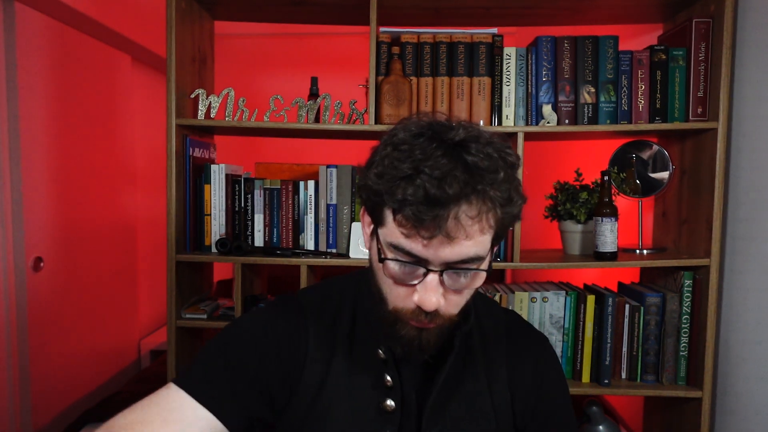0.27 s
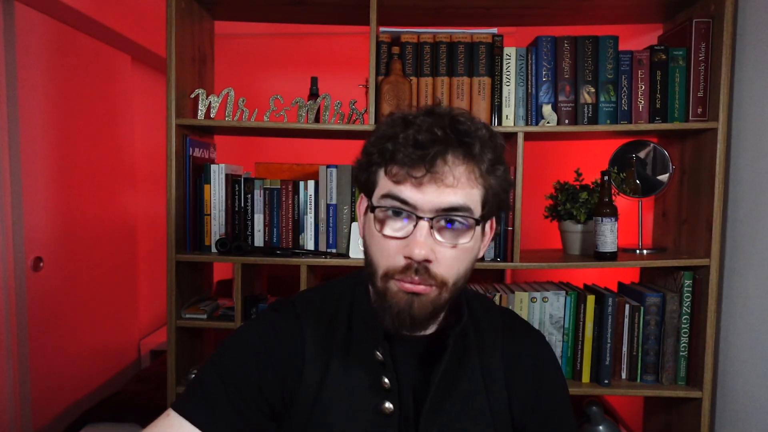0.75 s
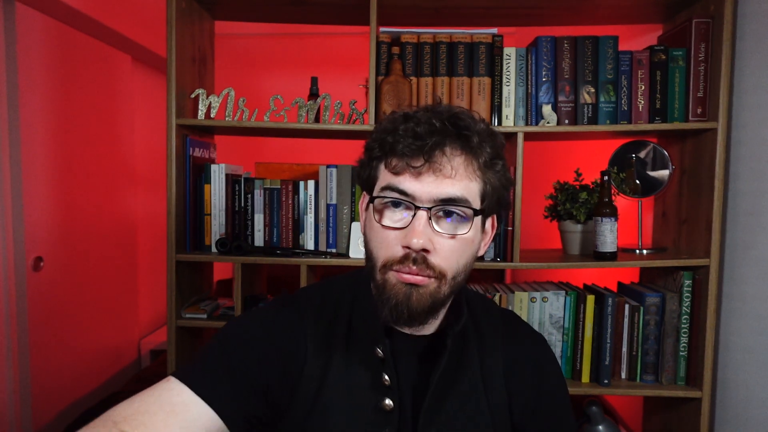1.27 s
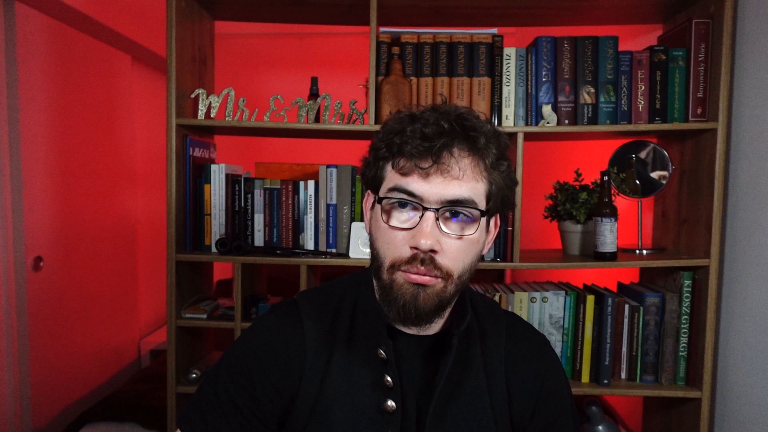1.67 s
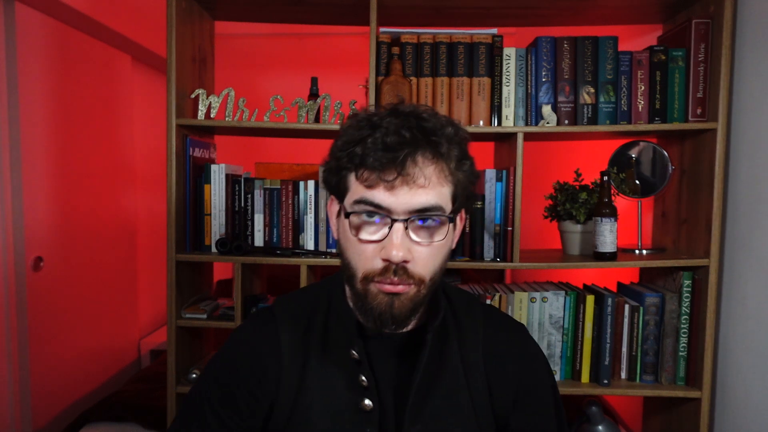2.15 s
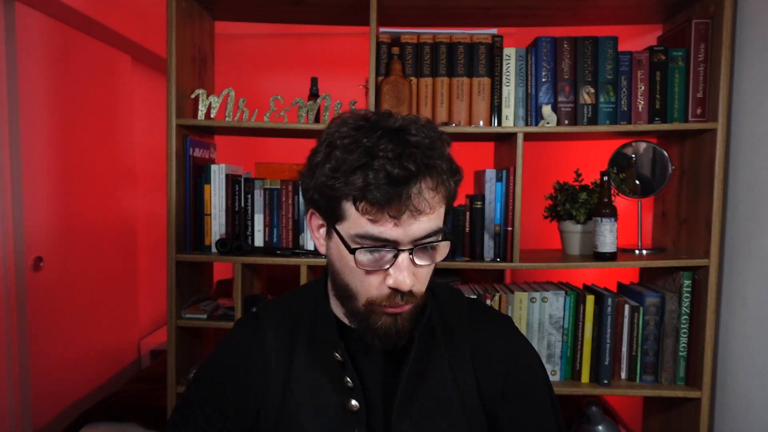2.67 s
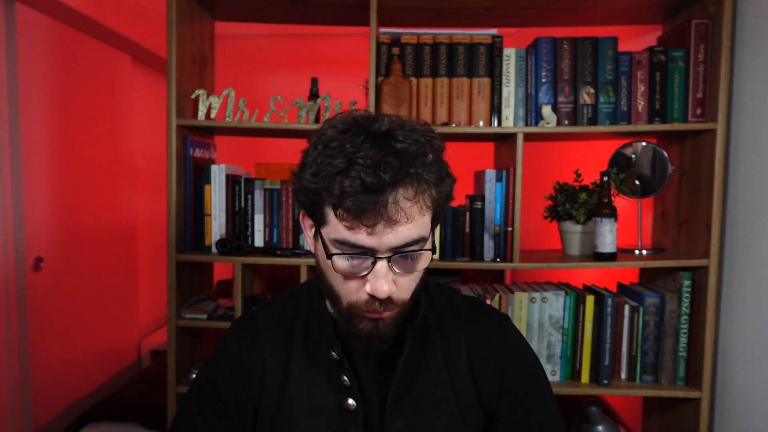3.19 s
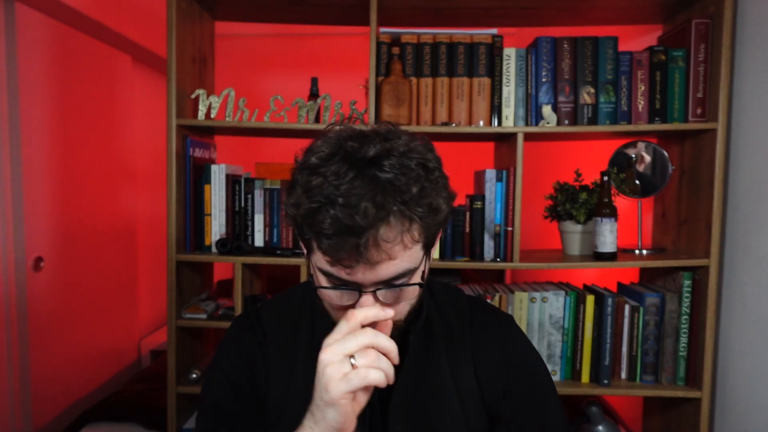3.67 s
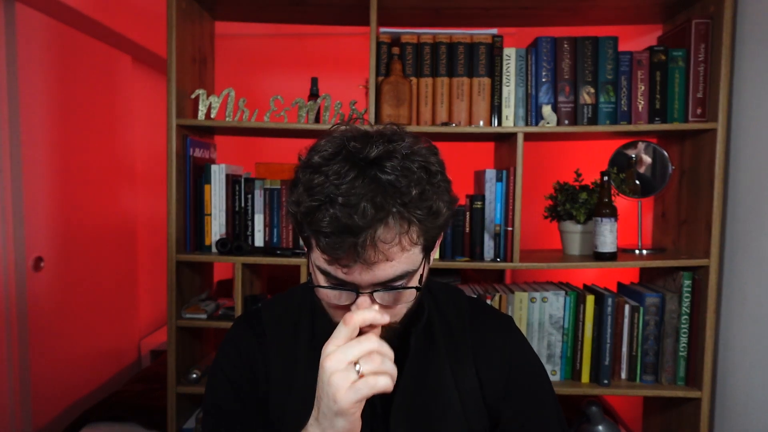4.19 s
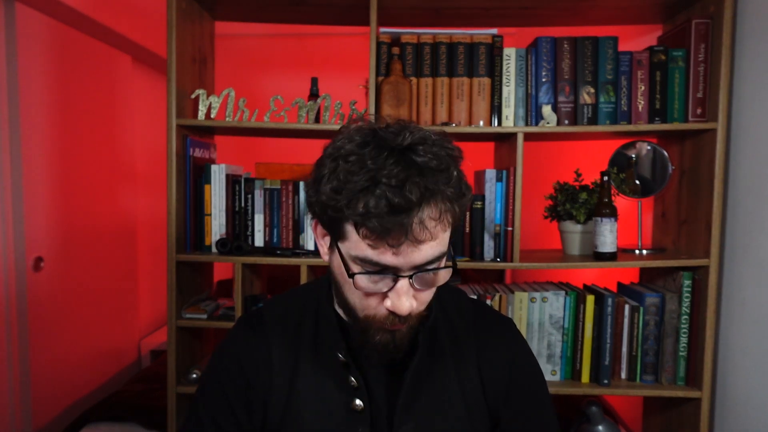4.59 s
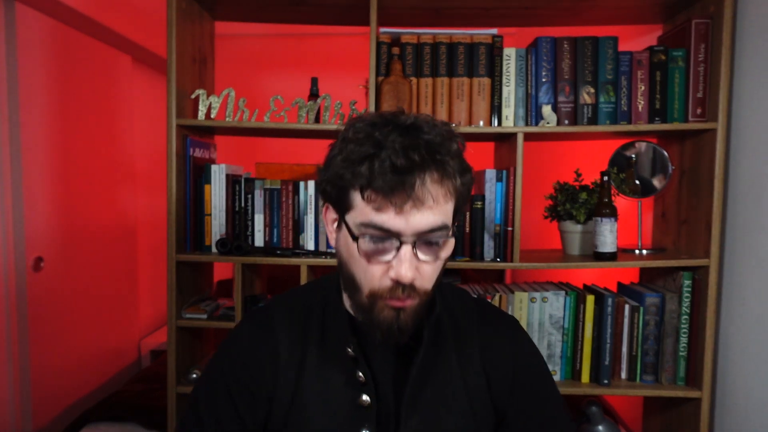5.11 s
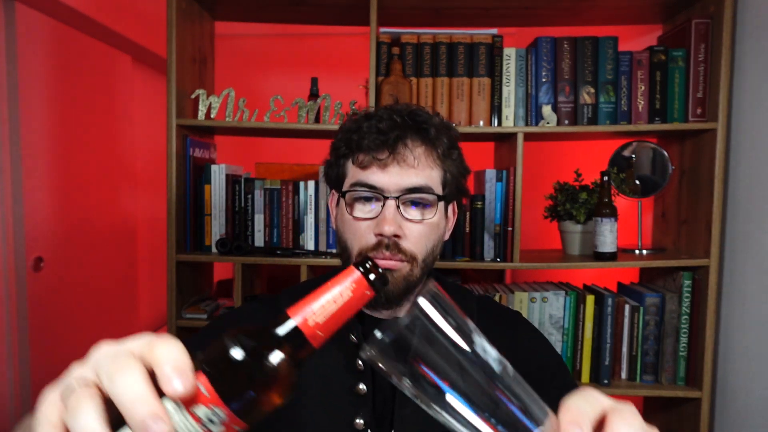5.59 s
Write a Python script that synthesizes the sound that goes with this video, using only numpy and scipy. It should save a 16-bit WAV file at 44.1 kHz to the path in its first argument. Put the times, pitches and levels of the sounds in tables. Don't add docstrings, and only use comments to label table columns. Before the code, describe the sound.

Bottle thuds and clinks on wood, small metal jingles, a cap pops with a rasping burst of gas, and a glass scrapes softly across boards.

```python
import sys
import numpy as np
from scipy import signal
from scipy.fft import rfft, irfft, next_fast_len
from scipy.io import wavfile
from scipy.ndimage import map_coordinates

SR = 44100
rng = np.random.default_rng(int(sys.argv[2]) if len(sys.argv) > 2 else 0)


def attenuation_scalar(level_db):
    decades = np.asarray(level_db, float) / 20
    return 10 ** decades


def dump_mix(stems):
    frames = np.atleast_2d(stems).T
    limited = np.clip(frames, -1, 1)
    pcm = np.round(limited * 32767).astype(np.int16)
    wavfile.write(sys.argv[1], SR, pcm)


N = 257984

# frequency in Hz, level in dB.
WHINES = [(6040, -90.5), (8107, -80.5), (10137, -85.5), (12150, -91)]
# frequency in Hz, level in dB per Hz.
HISS_COLOUR = [(18, -64), (30, -37.5), (86, -0.5), (266, 3), (328, -3.5), (569, -7), (844, -9),
               (1390, -10.5), (5310, -18.5), (8300, -20), (16000, -20.5)]
# frequency in Hz, likeness [0-1].
HISS_ALIKE = [(60, 0.46), (240, 0.56), (950, 0.33), (3770, 0.5), (15000, 0.17)]
# frequency in Hz, likeness [0-1].
ALIKE = [(100, 0.92), (700, 0.95), (1500, 0.81), (12000, 0.79)]
# frequency in Hz, t60 in seconds.
ROOM_DECAY = [(150, 0.96), (1000, 0.45), (4000, 0.3), (12000, 0.2)]
# frequency in Hz, level in dB.
ROOM_WIDTH = [(200, -10), (700, -7), (1500, -3), (8000, -0.5)]

# start in seconds, peak in dB, brightness in dB, ring in dB, scrape t60 in seconds.
KNOCKS = [(0.0014, -21, 5.5, -3, 0.27), (0.0295, -24.5, -1.5, 1.5, 0.19), (0.0825, -26.5, -4, -9, 0.093),
          (0.003, -38, 2, -26.5, 0.64), (.19, -44.5, -21, -14.5, 0.067), (.2189, -48, -10.5, -15, 0.12),
          (0.3326, -41.5, 8, -17.5, 0.17), (0.4304, -36.5, -5.5, -15, 0.81), (0.4455, -16.5, 4, -19.5, 0.1),
          (0.451, -25.5, 0, -16, 0.11), (0.479, -34.5, -8, -11.5, 0.068), (0.5549, -31.5, -7, -14, 0.07),
          (0.5845, -23.5, -5.5, -30, 0.095), (0.6174, -51.5, -1.5, -20.5, 0.38),
          (0.372, -49, -2, -11, 0.44), (2.382, -34.5, -20, -24.5, 0.34), (3.395, -39, -15.5, -18, 0.16),
          (3.403, -42, -15.5, -19, 0.19)]
# frequency in Hz, level in dB per Hz.
KNOCK_COLOUR = [(290, -22), (500, 3), (784, -17.5), (1250, -0.5), (1620, -10.5), (3150, -4), (3810, -9.5),
                (4800, -4), (6700, -12.5), (7530, -6), (16000, -14)]
# frequency in Hz, level in dB, t60 in seconds.
BOTTLE_MODES = [(1340, -21.5, 0.071), (2470, -26.5, 1), (2540, -27.5, 0.98), (2650, -22.5, 1),
                (2920, -6.5, 0.12), (3130, -28.5, .8), (3020, -12.5, .12), (3260, -4, 0.11), (7570, -7, .1),
                (10200, -20, 0.055), (12400, -6.5, 0.16)]
# start in seconds, peak in dB, deep mode in dB, low mode in dB, rattle in dB.
THUMPS = [(0.004, -12.5, -9, -9, -13), (0.026, -19, -25.5, -20, -21), (0.085, -11.5, -26.5, -11.5, -7),
          (0.188, -19, -11, -15, 4), (0.333, -22.5, -20, -13, 5.5), (0.43, -29, -11.5, 2.5, 7),
          (0.451, -12.5, -43, -10.5, 8.5), (.474, -26.5, -18.5, -20, 8), (0.58, -27, 0, -19, 16.5),
          (0.649, -59.5, -21, 21, -23), (0.797, -41, -26, 2, -6), (0.915, -35.5, -10, -9, -14),
          (1.195, -22, 5, 1.5, 12), (1.205, -27, -34, -21, -31), (1.365, -23, -9, -4.5, 9.5),
          (1.562, -44.5, -29, 1, -27), (1.698, -50.5, -12.5, 2, -21), (1.799, -42, 3, -6, -32),
          (1.98, -56.5, -2.5, 5.5, -18), (2.382, -37, -14.5, -26, 25.5), (2.888, -24, -33, -14, 3),
          (3.149, -26, -44.5, -11.5, -20), (4.449, -34.5, -8.5, -7, -8), (4.645, -32.5, -10, -4.5, 16),
          (4.72, -25.5, -9, -8, 8.5), (4.841, -27, -12.5, -14.5, -18)]
# frequency in Hz, level in dB, t60 in seconds.
DESK_MODES = [(118.45, 0, 0.59), (195.4, -2, 0.47), (235, -3, 0.33), (274.6, -1.5, 0.3), (344, -6, 0.024),
              (417, -10.5, 0.052), (437.4, -7.5, 0.17), (496, -4.5, 0.069)]
# frequency in Hz, width in Hz, level in dB.
RATTLE_PEAKS = [(281, 190, 9), (446, 130, -11.5), (760, 180, -6.5), (880, 7.1, -3), (1300, 29, -11)]
# start in seconds, level in dB, t60 in seconds.
SHUDDER = [
    (0.0, -15.5, 0.63),
    (0.19, -35.5, 2.07),
    (.62, -54, 2.9),
    (1.329, -51, 3.1),
]
# start in seconds, peak in dB, frequency in Hz.
SNAPS = [(0.0299, -16, 1800), (0.1909, -29.5, 1500), (0.5845, -18.5, 3800), (1.369, -34.5, 1200),
         (2.383, -31, 5000), (2.5407, -9, 6000), (2.721, -10, 2200), (2.8871, -6.5, 2600),
         (2.891, -7.5, 1700), (2.9825, -10.5, 2500), (3.0154, -9, 2000), (5.834, -46, 4200)]
# start in seconds, level in dB, frequency in Hz, t60 in seconds.
PINGS = [(0.445, -25, 2990, 0.1), (0.509, -41, 3020, .1), (.554, -31, 1400, 0.03),
         (0.555, -40, 3200, 0.025), (.452, -30, 1250, .1), (.452, -36, 2550, .05), (.19, -48, 2100, .04),
         (.19, -34, 650, .06), (0.584, -25, 3330, 0.024), (1.570, -43, 3010, 0.03),
         (1.617, -36.5, 2910, 0.03), (1.612, -52, 2150, 0.15), (1.616, -42, 4220, 0.038),
         (1.672, -31.5, 2450, 0.061), (1.684, -39, 2400, 0.04), (2.382, -44, 4580, 0.5),
         (2.382, -44, 5100, .4), (2.39, -46, 8640, 0.35), (2.385, -49, 10200, .3), (2.382, -58, 2120, 0.45),
         (2.384, -44, 7400, 0.35), (2.383, -45, 13150, 0.15), (2.383, -47, 13900, 0.2),
         (2.724, -37.5, 9750, 0.21), (2.834, -46, 9600, 0.14), (2.722, -28, 5150, 0.12),
         (2.722, -42, 7280, .35), (2.722, -36, 10250, .15), (2.888, -10, 2420, 0.03),
         (2.981, -15, 2400, .04), (3.05, -18, 2450, .06), (2.92, -17, 2280, .05), (2.5405, -18, 9590, .11),
         (2.559, -19, 8580, .08), (2.476, -25, 8600, .1), (2.633, -33, 8600, .08), (2.682, -33, 8600, .08),
         (3.115, -36, 5170, 0.14), (3.13, -40, 868, .8), (3.396, -34, 2990, .03), (3.396, -38, 3500, 0.07),
         (3.61, -31.5, 271, 0.39), (3.697, -29, 273, 0.45), (5.834, -60, 4060, 0.03),
         (5.836, -68, 4660, .02)]

# start in seconds, peak in dB, brightness in dB, ring in dB, scrape t60 in seconds.
LANDINGS = [
    (1.1924, -33, -11, -18.5, 0.21),
    (1.1982, -25, -4, -26, 0.15),
    (1.2087, -22.5, -3.5, -3, 0.28),
    (1.3583, -53, -9, -23, 0.34),
    (1.368, -44, -11, -24, 0.52),
]
# frequency in Hz, level in dB per Hz.
LANDING_COLOUR = [(290, -35.5), (500, -3), (1020, -3), (2930, -3.5), (4210, -1.5), (6700, -11),
                  (7860, -6.5), (10800, -17), (14200, -14.5), (16000, -27)]
# frequency in Hz, level in dB, t60 in seconds.
BASE_MODES = [(2190, -17.5, 0.1), (2450, -34, .9), (2552, -26.5, 1), (2600, -27, .5), (4140, 0.5, 0.051),
              (4740, -9.5, 0.08), (5570, -19, 0.0593), (7900, 3.5, 0.03)]
# start in seconds, peak in dB, brightness in dB, ring in dB, scrape t60 in seconds.
JINGLES = [(1.4371, -34.5, 1.5, -34.5, 0.17), (1.5708, -33, -7.5, -33, 0.7), (1.6177, -26.5, 4, -30, 0.16),
           (1.6696, -21, 4, -19, 0.06), (1.676, -27.5, 0.5, -22.5, 0.033), (1.6831, -11.5, 5, -22, 0.036),
           (1.6865, -19.5, 2.5, -21, 0.033), (1.6924, -23.5, -1, -31.5, 0.071),
           (1.7114, -30.5, 2.5, -7.5, 0.25), (1.9144, -55.5, 6.5, -14, 0.59), (2.0073, -44, -13, -20, 0.27),
           (2.0862, -47.5, -2, -28, 0.12), (2.2044, -58, -4.5, -13.5, 0.26)]
# frequency in Hz, level in dB per Hz.
JINGLE_COLOUR = [(530, -96), (900, -38), (2300, -22), (3230, -17.5), (4860, -6.5), (5680, -20), (7140, -17),
                 (9530, 0), (11600, -27.5), (13400, -18.5), (16000, -22.5)]
# frequency in Hz, level in dB, t60 in seconds.
JINGLE_MODES = [(3260, -21.5, 0.21), (3900, -15.5, 0.15), (4200, -10.5, 0.15), (4425, -19.5, .17),
                (4830, -3.5, .17), (4980, -3, 0.13), (5200, -5.5, .15), (8300, -19, .2), (9240, -18, 0.12),
                (9690, 3, 0.15), (9900, -16, .15), (13290, -22.5, 0.104)]
# start in seconds, peak in dB, brightness in dB, ring in dB.
CLINKS = [(2.382, -27, -2.5, -18.5), (2.468, -16.5, -0.5, -11), (2.4721, -14, 3, -13.5),
          (2.476, -20.5, -2.5, -13.5), (2.481, -24, -5.5, -8.5), (2.494, -30.5, -13.5, -11.5),
          (2.5399, -11.5, 1, -9.5), (2.558, -17, -11.5, -20), (2.565, -19, -8, -16),
          (2.6212, -18, -7, -16.5), (2.63, -24.5, -7, -15.5), (2.6611, -30.5, -9, -11),
          (2.6816, -28, -6, -13.5), (2.6866, -30.5, -7.5, -13), (2.7192, -12, -4.5, -34.5),
          (2.8876, -10.5, -0.5, -32)]
# frequency in Hz, level in dB per Hz.
CLINK_COLOUR = [(120, -37.5), (200, -18), (601, -11.5), (1040, -16), (2470, -7), (4120, -14), (5040, 0),
                (5630, -13), (8120, -10), (8740, -13), (9930, -12), (10900, -22), (16000, -19)]
# frequency in Hz, level in dB, t60 in seconds.
OPENER_MODES = [(2525, -18, .25), (3887, -20, .3), (4893, -8, .15), (5010, -5, .2), (5064, -2, .27),
                (7280, -14, .25), (7800, -12, .1), (8600, -11, .15), (9590, -10, .15), (13350, -16, .2),
                (14420, -12, .16), (15640, -11, .2)]

# start in seconds, peak in dB, ring in dB.
PRISES = [(2.7199, -7.5, -16.5), (2.829, -33, -14), (2.8869, -6, -24), (2.8909, -5.5, -26),
          (2.9088, -20, -25), (2.921, -6.5, -18), (2.9369, -12.5, -20), (2.959, -12.5, -31),
          (2.9838, -14, -20.5), (2.997, -14.5, -25.5), (3.0146, -8.5, -24.5), (3.022, -16, -23.5),
          (3.0282, -12, -30), (3.0527, -23, -12.5), (3.065, -15.5, -23.5), (3.3943, -27.5, -12)]
# start in seconds, level in dB, hold in seconds, fall in dB per second, fizz in dB.
BURSTS = [
    (2.715, -17, .03, 297.5, -7),
    (2.887, -17, 0.17, 290, 2.5),
    (3.07, -50, .02, 39.5, 0.5),
]
# frequency in Hz, level in dB per Hz.
GAS_COLOUR = [(59, -52.5), (100, -26), (170, -22.5), (250, 4), (621, -0.5), (676, -2.5), (836, 2),
              (991, -3.5), (2420, 2), (8280, -19.5), (10000, -20), (10900, -26), (16000, -38)]
# frequency in Hz, level in dB per Hz.
FIZZ_COLOUR = [(2940, -30), (5000, 5.5), (7490, -5), (8170, -7), (10600, -6.5), (11000, -21.5),
               (12200, -16.5), (13500, -12), (16000, -11)]
# frequency in Hz, level in dB, t60 in seconds.
NECK_MODES = [(430, -13.5, 0.42), (617, -16, 0.25), (859, -12, 0.66), (1510, -20, .9), (1846, -15.5, 0.58),
              (2000, -18.5, 0.25), (2230, -25, .6), (2385, -12.5, 0.79), (2492, -21.5, 1), (2552, -27, 2.2),
              (2650, -11.5, 0.77), (2700, -19.5, .6), (3058, -29.5, .9), (3550, -20, 0.7)]
# frequency in Hz, level in dB, t60 in seconds.
CAP_MODES = [(5160, -9, .1), (7270, 0, .2), (8810, -7, .13), (9460, -12, .15), (9760, -14, .1),
             (10300, -2, .13), (12900, -2, .09), (14810, -4, .1), (15680, -8, .08)]
# frequency in Hz, width in Hz, level in dB.
WALL_PEAKS = [(2480, 260, 0), (2640, 120, -3)]

# time in seconds, friction in dB.
STROKES = [
    [(3.48, -61), (3.528, -64), (3.62, -54), (3.786, -48.5), (3.792, -46.5), (4.438, -50.5), (4.58, -71.5)],
    [(4.58, -72), (4.586, -68), (4.604, -62.5), (4.684, -51), (4.82, -63.5), (4.848, -69.5), (5.0, -77.5)],
]
# time in seconds, level in dB.
HAND_WEIGHT = [(3.45, -5), (3.75, 3), (3.88, -2), (4.0, 1.5), (4.1, -1), (4.22, -2), (4.33, 4.5), (4.42, 1),
               (4.5, -3), (4.64, 1.5), (4.75, 0), (4.9, 1), (5.1, -3)]
# time in seconds, level in dB.
GLIDE = [(3.45, -3.5), (3.6, -0.5), (3.9, -0.5), (4.1, 2), (4.3, 5.5), (4.45, 6), (4.55, -2), (4.62, 7),
         (4.7, 3.5), (4.8, 3.5), (5.1, 1)]
# frequency in Hz, width in Hz, level in dB.
BOARD_PEAKS = [(171.6, 16, 0), (215, 14, 0), (388.5, 24, 4.5), (499.4, 9.5, 5), (656.5, 63, -5.5),
               (890, 93, -21)]
# frequency in Hz, width in Hz, level in dB.
FOOT_PEAKS = [(4310, 150, 0), (5700, 150, -12), (9750, 500, -11)]
# frequency in Hz, level in dB per Hz.
DRAG_COLOUR = [(530, -30), (900, -5), (1170, 3.5), (1810, 9), (2450, 10.5), (3000, 3), (3910, -0.5),
               (4360, 2), (5160, -7.5), (9090, -34), (9880, -36), (10900, -31.5), (15100, -21),
               (16000, -24.5)]
# start in seconds, peak in dB, brightness in dB, ring in dB, scrape t60 in seconds.
GRIT_TICKS = [
    (4.236, -55.5, 6.5, -40.5, .12),
    (4.793, -67, 3, -40, .06),
]
# frequency in Hz, level in dB per Hz.
GRIT_COLOUR = [(5500, -12), (7500, 3), (10500, -4), (12000, 0), (14500, 5.5), (16000, -3.5)]
# start in seconds, end in seconds, frequency in Hz, level in dB.
SQUEAK = (4.74, 4.85, 5740, -71)


def unit(x):
    return x / np.sqrt(np.mean(x ** 2) + 1e-20)


def along(points, hz):
    f, v = np.transpose(points)
    return np.interp(np.log(hz + 1), np.log(f + 1), v)


def since(s):
    return np.arange(N) / SR - s


def level_curve(rows):
    s, db = np.transpose(rows)
    return attenuation_scalar(np.interp(since(0), s, db, -150, -150))


def wobble(rate):
    knots = rng.standard_normal(int(N * rate / SR) + 4)
    return map_coordinates(knots, [np.arange(N) * rate / SR])


def smooth(x, keep):
    return signal.lfilter([1 - keep], [1, -keep], x)


def highpass(x, order, hz):
    return signal.sosfilt(signal.butter(order, hz, "high", fs=SR, output="sos"), x)


def noise(response, alike=ALIKE):
    m = next_fast_len(N)
    hz = np.fft.rfftfreq(m, 1 / SR)
    turn = np.arccos(np.clip(along(alike, hz), -1, 1)) / 2
    spectra = rfft(rng.standard_normal((2, m))) * response(hz)
    mid, side = irfft(spectra * [np.cos(turn), np.sin(turn)], m)[:, :N]
    return unit(np.array([mid + side, mid - side]))


def colour(points, lo_hz=0, hi_hz=SR):
    return lambda hz: attenuation_scalar(along(points, hz)) * (hz >= lo_hz) * (hz < hi_hz)


def humps(peaks, power=1):
    def response(f):
        return sum(attenuation_scalar(db) * f * w / np.hypot(c * c - f * f, f * w + 1) for c, w, db in peaks) ** power
    return response


def ringing(modes, spread_db, waver_hz, attack, beat=0.95):
    hz, db, t60 = np.transpose(modes)[:, :, None]
    pitch, swell = rng.standard_normal((2, len(modes), 100))
    n = int(SR * min(1, t60.max()))
    t = np.arange(n) / SR
    wander = waver_hz * np.repeat(pitch, SR // 100, axis=1)[:, :n]
    beats = 1 + beat * np.array([np.interp(100 * t, np.arange(100), row) for row in swell])
    size = attenuation_scalar(db + spread_db * rng.standard_normal(hz.shape) - 60 * t / t60) * beats
    phase = 2 * np.pi * np.cumsum(hz + wander, axis=1) / SR
    ring = size * np.sin(phase) * (1 - np.exp(-t / attack))
    return np.pad(ring, ((0, 0), (0, SR - n)))


def sides(rings):
    lean_db = 4 * rng.standard_normal(len(rings))
    return attenuation_scalar([lean_db / 2, -lean_db / 2]) @ rings


def contacts(events, spectrum, modes, crack_s, tail_db, waver, lo_hz):
    split_hz = 5500
    body, edge = np.zeros((2, N + SR))
    ring = np.zeros((2, N + SR))
    t = np.arange(SR) / SR
    high = np.transpose(modes)[0][:, None] > split_hz
    for s, db, bright_db, ring_db, tail in events:
        at = slice(round(s * SR), round(s * SR) + SR)
        crack = attenuation_scalar(db - 60 * t / crack_s)
        scrape = attenuation_scalar(db + tail_db - 60 * t / max(tail, .01))
        shape = (crack + scrape) * (1 - np.exp(-t / .0004))
        body[at] += shape
        edge[at] += attenuation_scalar(bright_db) * shape
        struck = ringing(modes, 2.5, waver, attack=.0005)
        ring[:, at] += attenuation_scalar(db + ring_db) * sides(struck * np.where(high, attenuation_scalar(bright_db), 1))
    rough = body[:N] * noise(colour(spectrum, hi_hz=split_hz))
    rough = rough + edge[:N] * noise(colour(spectrum, lo_hz=split_hz))
    return highpass(rough + ring[:, :N], 4, lo_hz)


def hiss():
    whines = 0
    for hz, db in WHINES:
        whines = whines + attenuation_scalar(db + 2.5 + 1.5 * wobble(8)) * np.sin(2 * np.pi * hz * since(0))
    floor = attenuation_scalar(-64.5 + .6 * wobble(1.2)) * noise(colour(HISS_COLOUR), HISS_ALIKE)
    return attenuation_scalar([[.6], [-.6]]) * (floor + whines)


def bottle():
    return contacts(KNOCKS, KNOCK_COLOUR, BOTTLE_MODES, crack_s=0.0083, tail_db=-9.5, waver=65, lo_hz=445.0)


def desk():
    boom, shake = np.zeros((2, N + SR))
    t = np.arange(SR) / SR
    for s, db, deep_db, low_db, rattle_db in THUMPS:
        at = slice(round(s * SR), round(s * SR) + SR)
        rise = .002 if db > -25.5 else .02
        modes = ringing(DESK_MODES, 1.0, waver_hz=11, attack=rise, beat=0.42)
        mixed = attenuation_scalar(deep_db + 3.5) * modes[0] + attenuation_scalar(low_db + 11.5) * modes[1] + modes[2:].sum(0)
        boom[at] += attenuation_scalar(db - 10.0) * mixed
        shake[at] += attenuation_scalar(db + rattle_db - 19.5 - 60 * t / 0.22) * (1 - np.exp(-t / rise))
    settling = sum((since(s) > 0) * attenuation_scalar(db - 60 * np.abs(since(s)) / t60) for s, db, t60 in SHUDDER)
    rattle = unit(attenuation_scalar(2.2 * wobble(70))) * noise(humps(RATTLE_PEAKS, 2))
    return boom[:N] + (shake[:N] + attenuation_scalar(-9.5) * settling) * rattle


def snaps():
    out = np.zeros(N + SR)
    t = np.arange(SR // 50) / SR
    for s, db, hz in SNAPS:
        fade = attenuation_scalar(db + 1.5 - 60 * t * hz / 5)
        out[round(s * SR):][:len(t)] += fade * np.sin(2 * np.pi * hz * t)
    return out[:N] * np.ones((2, 1))


def pings():
    out = np.zeros((2, N + SR))
    for s, db, hz, t60 in PINGS:
        waver = 0.014 * min(hz, 1500)
        ring = ringing([(hz, db, t60)], 0, waver_hz=waver, attack=0.017 * t60, beat=.5)
        out[:, round(s * SR):][:, :SR] += sides(ring)
    return out[:, :N]


def base():
    return contacts(LANDINGS, LANDING_COLOUR, BASE_MODES, crack_s=0.011, tail_db=-16, waver=80, lo_hz=503)


def jingle():
    return contacts(JINGLES, JINGLE_COLOUR, JINGLE_MODES, crack_s=0.0037, tail_db=-16, waver=78, lo_hz=1296)


def opener():
    events = [(*row, 0.24) for row in CLINKS]
    return contacts(events, CLINK_COLOUR, OPENER_MODES, crack_s=0.0026, tail_db=-16.5, waver=25, lo_hz=200)


def slips():
    bright_db, dulls_db_per_s, from_s, tail_s = -9.5, 26.5, 1.6, 0.054
    events = [(s, db, bright_db - dulls_db_per_s * max(s - from_s, 0), ring_db, tail_s)
              for s, db, ring_db in PRISES]
    return contacts(events, GAS_COLOUR, NECK_MODES, crack_s=0.0064, tail_db=-8.5, waver=18, lo_hz=170.6)


def bursts():
    gas_rise_s, fizz_rise_s, fizz_db, fizz_grows = 0.018, 0.014, -10, 1.163
    effort, fizz = np.zeros((2, N))
    for s, db, hold, fall, thin_db in BURSTS:
        t = np.maximum(since(s), 0)
        flow = (t > 0) * attenuation_scalar(db - fall * np.maximum(t - hold, 0))
        effort += flow * (1 - np.exp(-t / gas_rise_s))
        fizz += attenuation_scalar(fizz_db + thin_db) * flow ** fizz_grows * (1 - np.exp(-t / fizz_rise_s))
    return effort, fizz


def cap():
    effort, fizz = bursts()
    jerks = unit(attenuation_scalar(.4 * wobble(60) + 2.6 * wobble(500)))
    gas = effort * noise(colour(GAS_COLOUR, hi_hz=5500)) + fizz * noise(colour(FIZZ_COLOUR, lo_hz=5500))
    neck_ring = ringing(NECK_MODES, 0, waver_hz=11, attack=.0004).sum(0)
    neck = signal.fftconvolve(effort * jerks * rng.standard_normal(N), neck_ring)
    cap_ring = sides(ringing(CAP_MODES, 0, waver_hz=9.2, attack=.0004, beat=.3))
    metal = signal.fftconvolve([fizz * jerks * rng.standard_normal(N)], cap_ring, axes=1)
    return jerks * gas + attenuation_scalar(-56.5) * neck[:N] + attenuation_scalar(-33) * metal[:, :N]


def wall():
    t60_s = 1.07
    stored = smooth(bursts()[0] ** 2, attenuation_scalar(-120 / (t60_s * SR)))
    return attenuation_scalar(-12.5) * np.sqrt(np.abs(stored)) * noise(humps(WALL_PEAKS, 2))


def strokes():
    full_db, sing_db, sing_grows, board_rings_s = -54.5, -6.5, 1.2, 0.015
    friction = sum(level_curve(stroke) for stroke in STROKES)
    board = smooth(friction, np.exp(-1 / (board_rings_s * SR)))
    rumble = attenuation_scalar(8.5) * level_curve(HAND_WEIGHT) * board
    sing = attenuation_scalar(full_db + sing_db) * level_curve(GLIDE) * (friction / attenuation_scalar(full_db)) ** sing_grows
    hum = attenuation_scalar(9 - 22 * np.abs(since(3.72))) * board
    return rumble, sing, friction, hum


def glass():
    rumble, sing, friction, hum = strokes()
    lumps = wobble(22)
    rumble = rumble * unit(attenuation_scalar(2.2 * lumps + 2 * wobble(70))) * noise(humps(BOARD_PEAKS))
    hum = hum * noise(humps([(272.0, 45, 0)]))
    sing = sing * unit(attenuation_scalar(0.48 * lumps + 0.56 * wobble(20))) * noise(humps(FOOT_PEAKS, 2))
    rough = unit(attenuation_scalar(.4 * lumps + 0.8 * wobble(180)))
    contact = attenuation_scalar(-0.5) * friction * rough * noise(colour(DRAG_COLOUR, lo_hz=926))
    return rumble + hum + sing + contact


def grit():
    return contacts(GRIT_TICKS, GRIT_COLOUR, CAP_MODES, crack_s=.01, tail_db=-8.0, waver=22, lo_hz=6000)


def squeak():
    start, end, hz, db = SQUEAK
    gate = np.clip(np.minimum(since(start), -since(end)) / 0.028, 0, 1)
    return attenuation_scalar(db) * gate * noise(humps([(hz, 40, 0)], 2))


def room(x, wet_db):
    hz, t, z = signal.stft(rng.standard_normal((2, SR // 2)), SR, nperseg=256)
    z[1] *= attenuation_scalar(along(ROOM_WIDTH, hz))[:, None]
    fade = attenuation_scalar(-60 * t / along(ROOM_DECAY, hz)[:, None])
    mid, side = signal.istft(z * fade, SR, nperseg=256)[1]
    tail = np.array([mid + 0.5 * side, mid - 0.15 * side])
    late = np.pad(x, ((0, 0), (200, 0)))
    wet = signal.fftconvolve(late, tail / np.linalg.norm(tail[0]), axes=1)
    return x + attenuation_scalar(wet_db) * wet[:, :N]


def scene():
    handled = room(bottle() + base(), wet_db=-8.0)
    steel = room(jingle() + opener(), wet_db=-10.0)
    opening = room(slips() + cap() + pings(), wet_db=-10.0)
    dragged = room(glass() + grit() + squeak(), wet_db=-8.0)
    touches = room(snaps() + wall(), wet_db=-12)
    return handled + steel + opening + dragged + desk() + touches


def top_cut(x):
    return signal.sosfilt(signal.butter(12, 15800, fs=SR, output="sos"), x)


def record(dry):
    rounded = dry / (1 + np.abs(dry / .72) ** 4) ** .25
    mix = highpass(rounded, 6, 66) + hiss()
    return top_cut(mix)


dry = scene()
out = record(dry)
dump_mix(out)
```